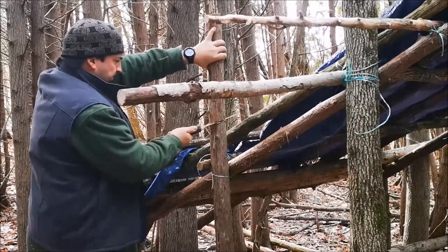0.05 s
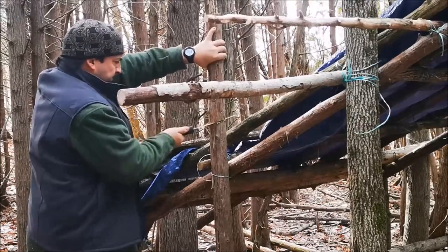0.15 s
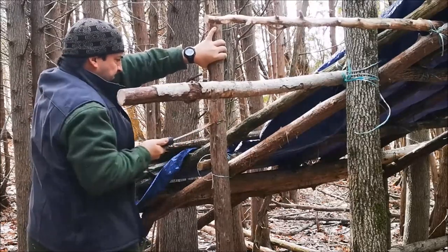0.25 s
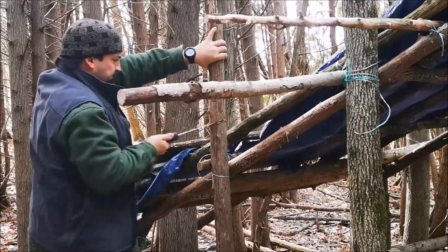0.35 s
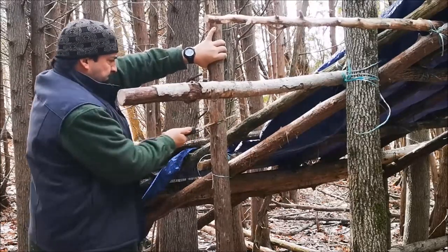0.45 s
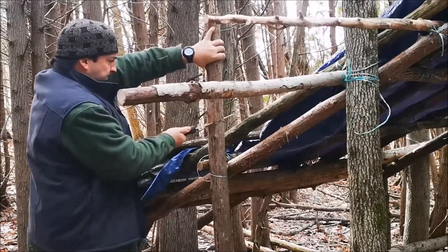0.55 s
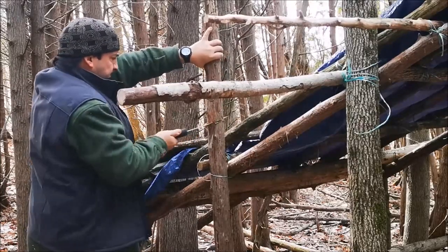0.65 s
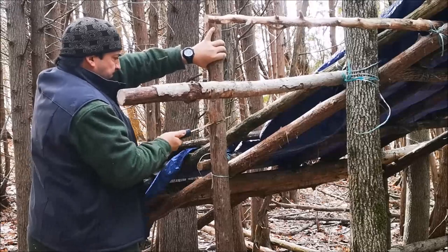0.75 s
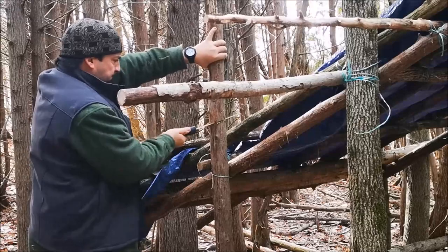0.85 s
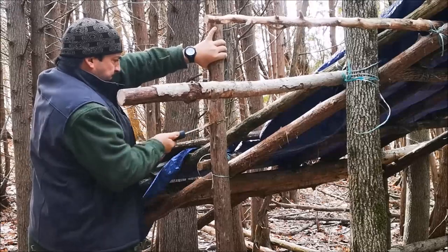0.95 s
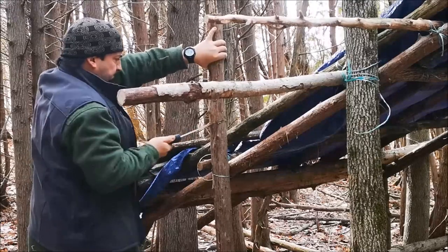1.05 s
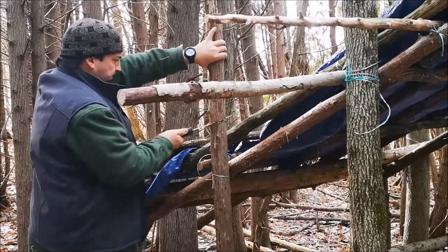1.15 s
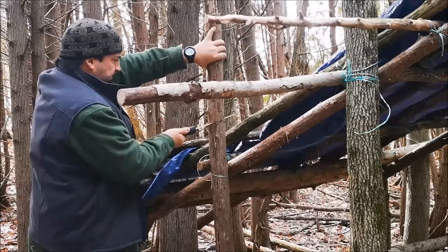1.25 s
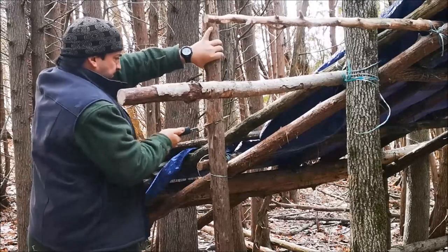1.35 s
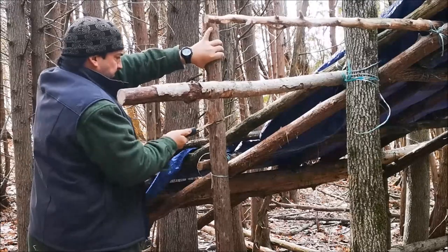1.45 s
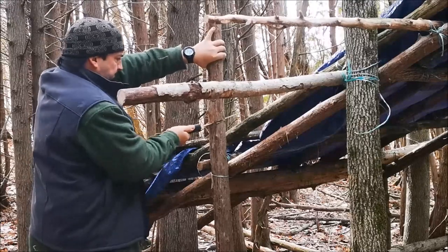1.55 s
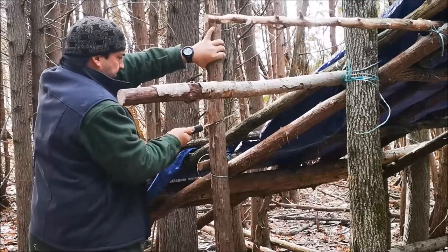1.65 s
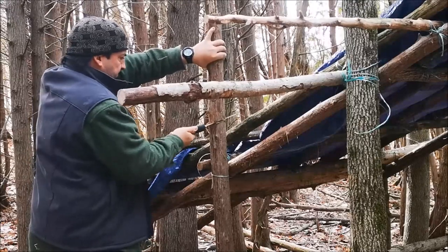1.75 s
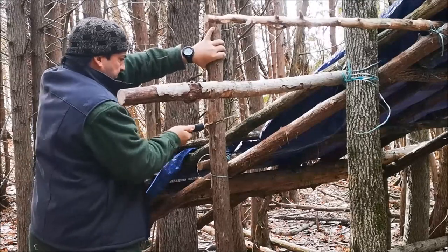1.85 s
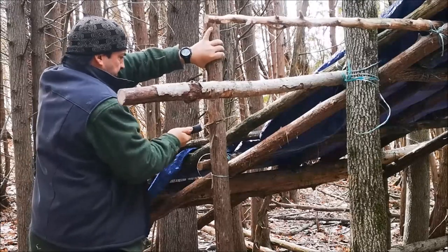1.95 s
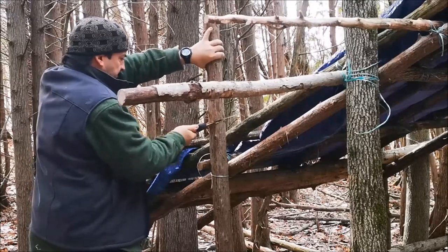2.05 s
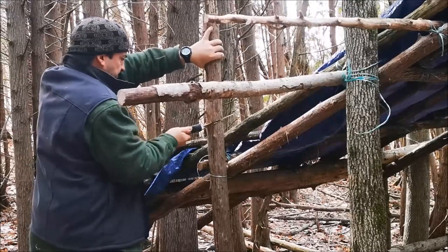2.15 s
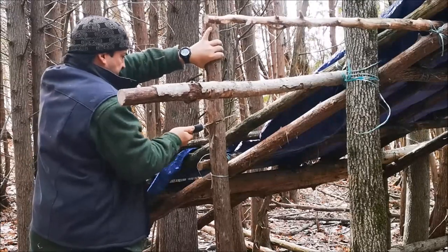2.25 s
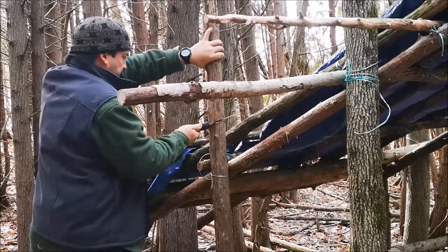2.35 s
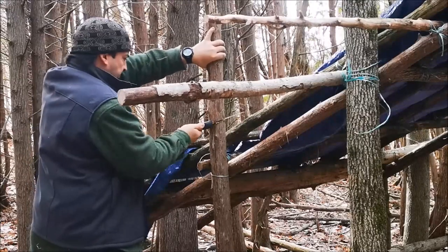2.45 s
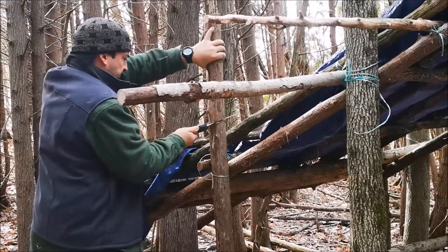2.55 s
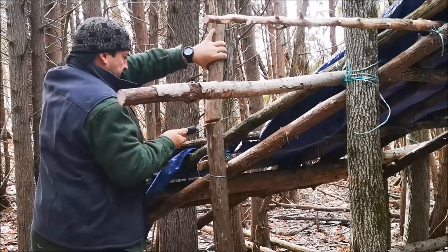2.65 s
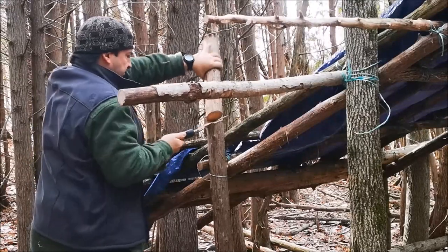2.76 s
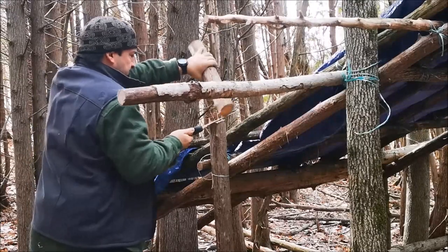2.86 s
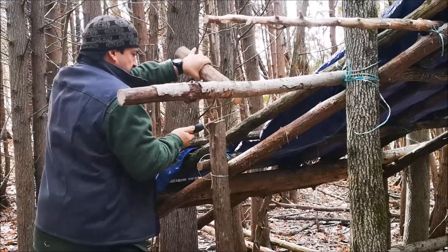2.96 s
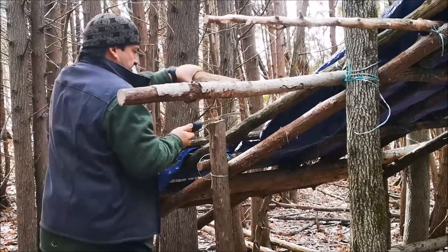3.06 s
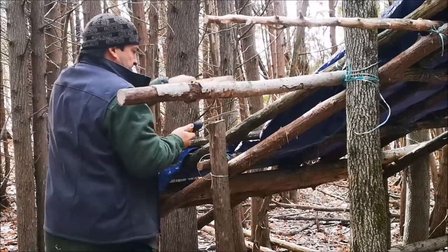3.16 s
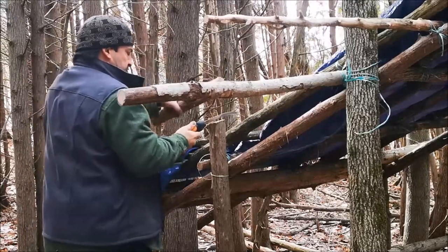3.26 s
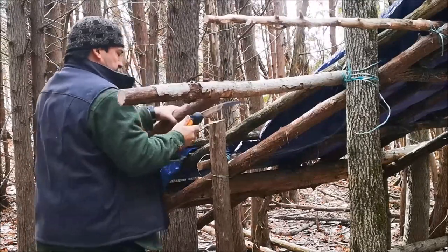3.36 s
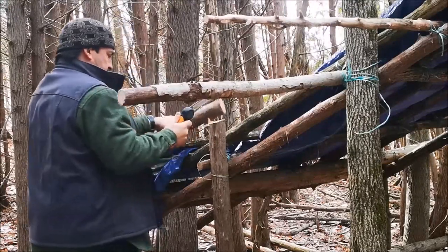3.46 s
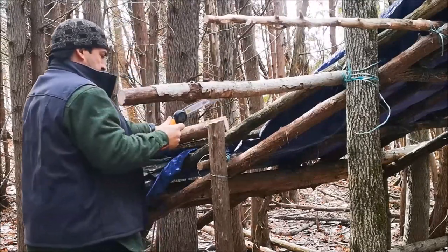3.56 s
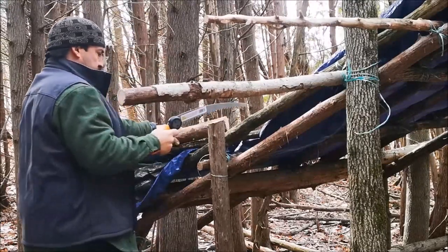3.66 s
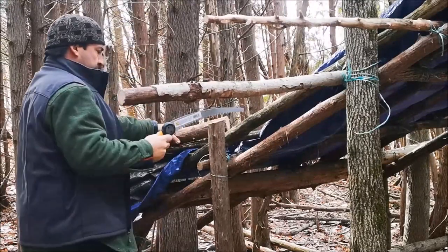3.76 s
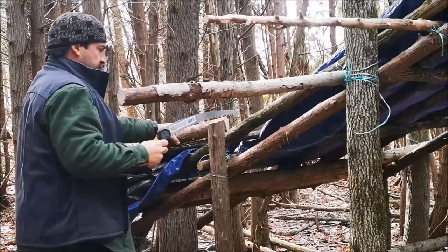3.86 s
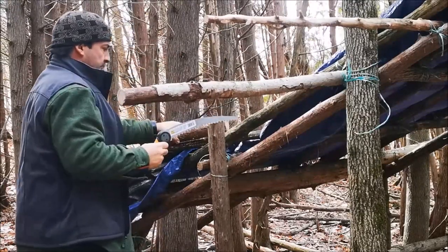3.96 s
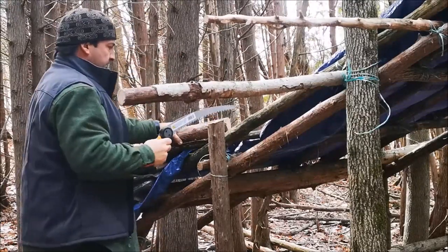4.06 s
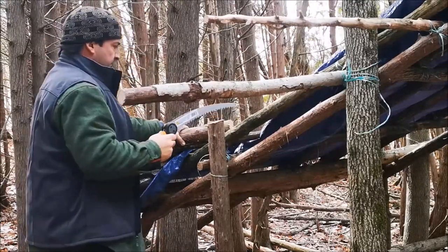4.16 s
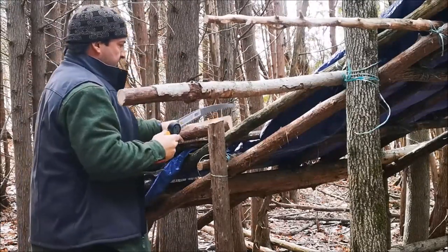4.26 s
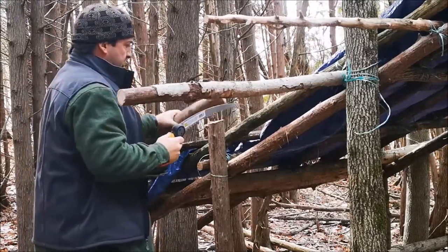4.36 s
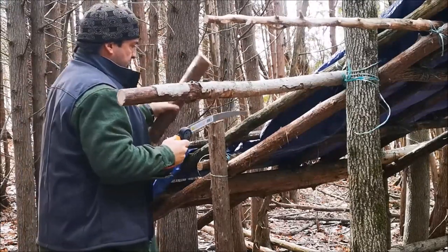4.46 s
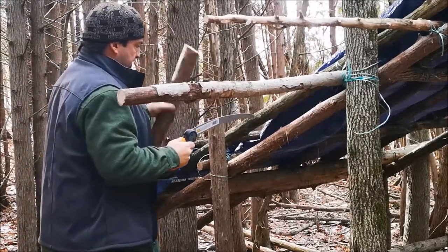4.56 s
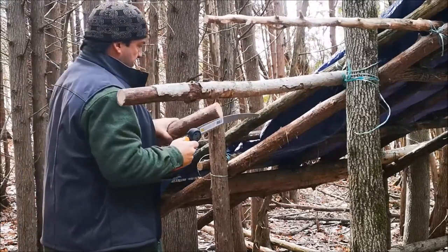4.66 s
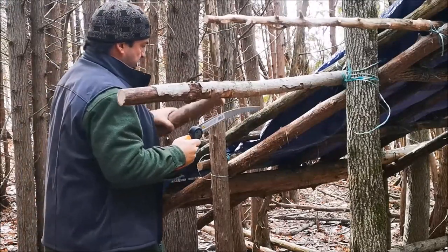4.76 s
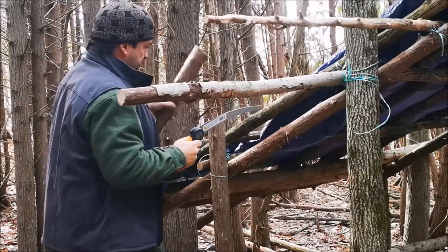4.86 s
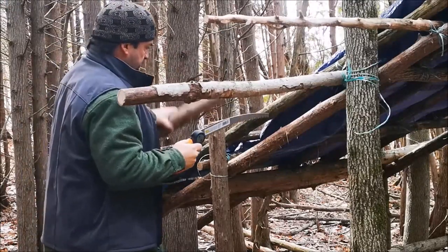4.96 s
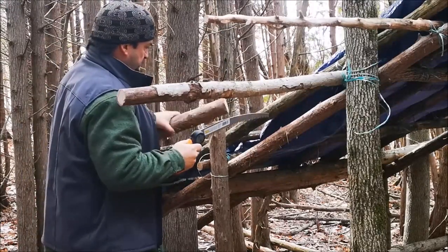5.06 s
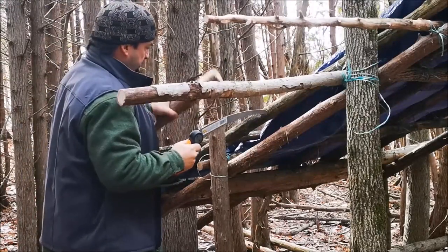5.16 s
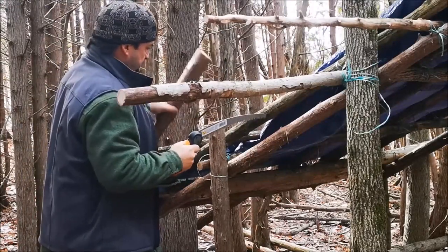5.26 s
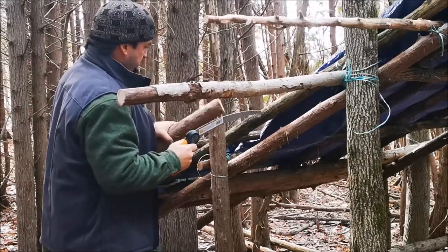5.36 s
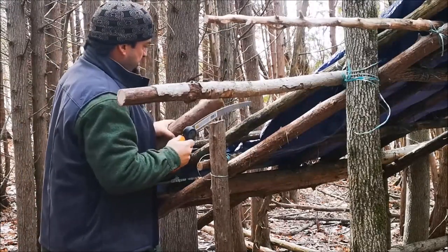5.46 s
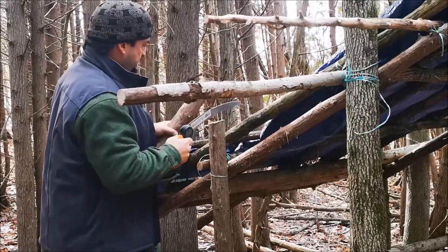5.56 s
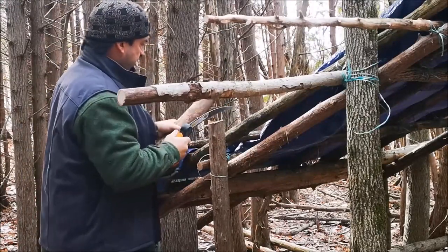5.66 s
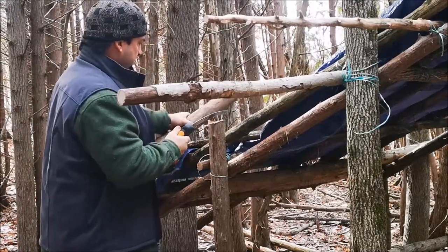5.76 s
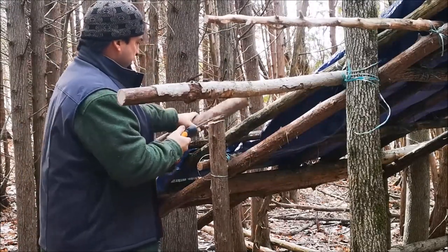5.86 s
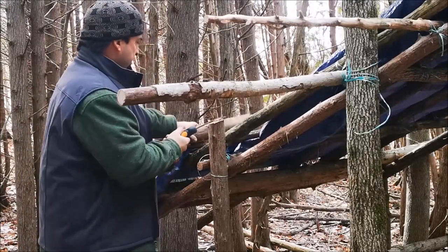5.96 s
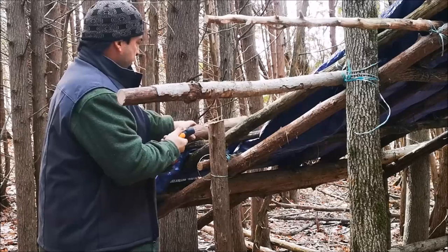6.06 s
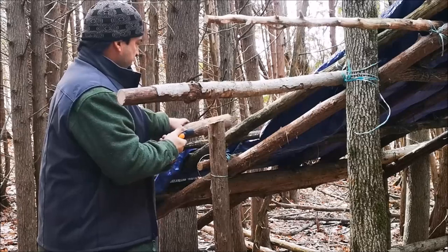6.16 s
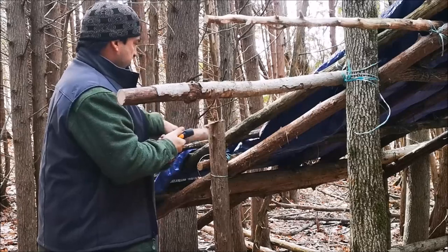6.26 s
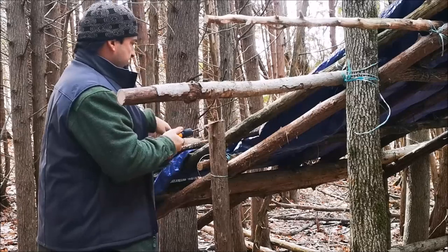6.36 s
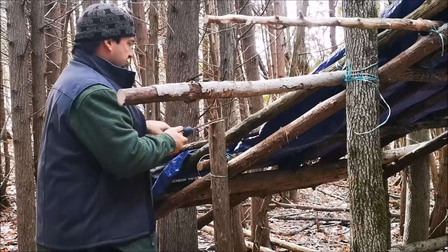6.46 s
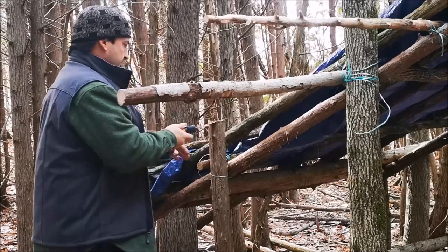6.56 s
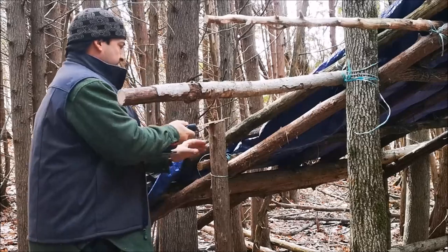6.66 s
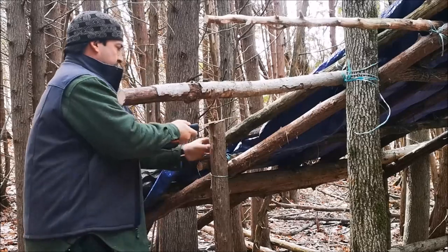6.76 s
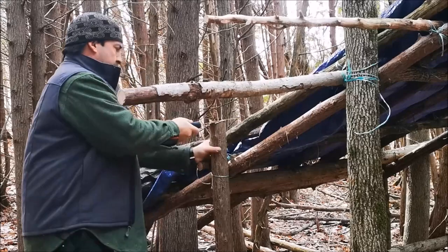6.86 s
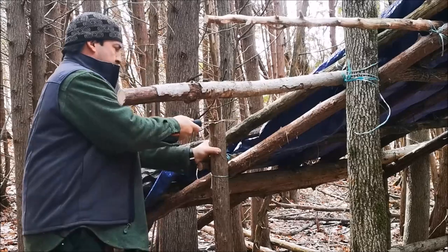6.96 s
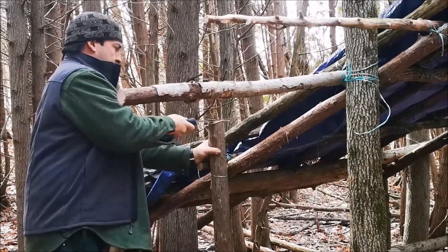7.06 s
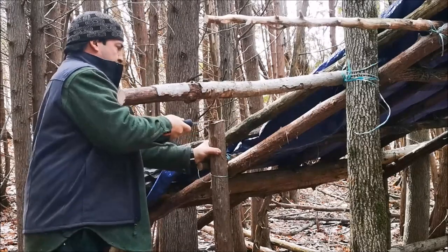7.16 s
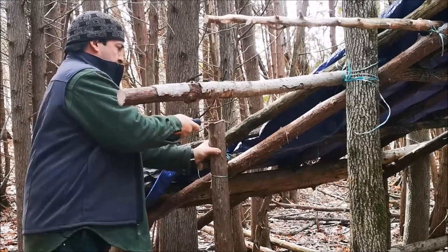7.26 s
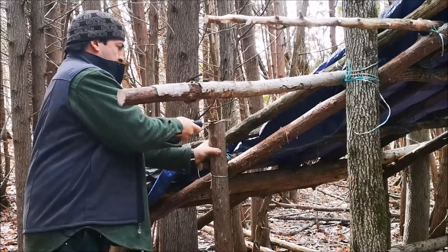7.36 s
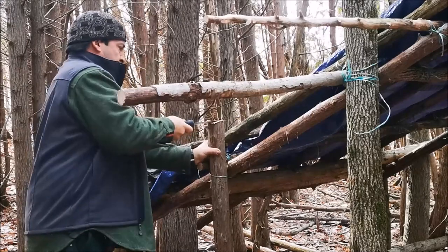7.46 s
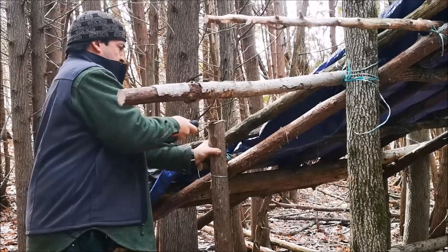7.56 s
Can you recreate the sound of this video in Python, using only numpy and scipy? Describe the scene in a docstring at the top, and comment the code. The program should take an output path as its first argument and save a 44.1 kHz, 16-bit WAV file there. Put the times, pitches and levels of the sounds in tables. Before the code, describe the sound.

A hand saw rasps through a wooden post outdoors, the wood snaps, a few light taps follow, and the sawing briefly resumes.

```python
"""Pruning saw in a wood

A saw rasps in a thin upright post: teeth tear fibres, ring wood and blade, shake the frame. The post
knocks in its lashings, is wrenched and snaps. The cut piece is handled, tapped three times and lands
on a pole; the saw bites again in the stump. Sleeves and bark rustle over a low distant rumble.
The two microphone ports colour the treble differently; the left one faces the work."""
import sys
import numpy as np
from scipy import signal
from scipy.fft import rfft, irfft
from scipy.io import wavfile
from scipy.ndimage import uniform_filter1d

SR = 44100
rng = np.random.default_rng(int(sys.argv[2]) if len(sys.argv) > 2 else 0)


def to_wav(s):
    """Save 16-bit WAV."""
    ch = np.atleast_2d(s).T  # columns
    pcm = np.round(np.clip(ch, -1, 1) * 32767)  # PCM
    wavfile.write(sys.argv[1], SR, pcm.astype(np.int16))


N = 336042

# strokes: t/s, length/s, end level/dB, swell/dB, low ring and shake/dB, high ring and grit/dB
PULLS = [(0.0, 0.04, -35.5, -4.5, 3.5, 0.5), (.309, .13, -34.5, 0.5, 3, 0), (.782, 0.057, -38, 0, -2, 0.5),
         (1.083, .11, -36, 2.5, -0.5, 0), (1.516, 0.048, -37.5, 4.5, -8, -2.5),
         (1.87, 0.087, -56.5, 5.5, 0, 6), (2.14, 0.077, -55.5, -3.5, 0, 7), (2.30, 0.043, -57, -1, 2, 4.5)]  # cutting
PUSHES = [(.09, 0.17, -45, 12.5, -0.5, 2), (.51, 0.16, -48, 13, 1.5, 3.5), (.70, 0.087, -48, 8, 2, 2.5),
          (.89, 0.14, -53, 7.5, -4.5, 2), (1.25, .15, -47.5, 13, 1, 1), (1.44, 0.066, -57.5, 5, 1.5, 2.5),
          (1.6, .11, -52.5, 5.5, -4, -0.5)]  # light return
# new cut in the stump: t/s, length/s, end level/dB, swell/dB, ring/dB, shake/dB, rise/s, fall/s
RESTARTS = [(6.939, 0.082, -56, 14, -8, -18, .04, 0.025),
            (7.032, 0.11, -51.5, -2.5, -12.5, -29, .015, 0.18),
            (7.12, 0.18, -36, 16.5, -8, -12.5, 0.082, 0.072),
            (7.355, 0.13, -52, 4.5, -10.5, -14, 0.03, 0.06), (7.545, 0.067, -37, 14, -8, -9, 0.025, .05)]
# resonances driven by the teeth: f/Hz, nominal width/Hz, level/dB
RING_LOW = [(874, 50, -1), (1174, 173, -3)]
RING_HIGH = [(1706, 340, -10.5), (2327, 57, 2.5), (2446, 79, -4), (2785, 45, -1.5)]
GRIT = [(3330, 660, -5), (4060, 200, -3), (4680, 350, 0)]
WHINE = [(5676, 250, 0)]
FRAME_SHAKE = [(119.3, 11, 5), (291, 70, 0.5), (453, 153, -17)]
STUMP_RING = [(1220, 66, -1.5), (1780, 160, -5.5), (2240, 170, 1.5), (2780, 180, 0), (3480, 270, -3),
              (4170, 310, -6), (4830, 250, -4), (5390, 470, 3)]
STUMP_SHAKE = [(82, 23, 5.5), (132.4, 48, 0), (300, 96, -11), (455, 91, -11)]
# offsets from the rasp: low ring/dB, high ring/dB, grit/dB, whine/dB, shake/dB
PULL_SHARES_DB, PUSH_SHARES_DB = (-12.5, -12, -20, -12.5, -10), (-6, -9, -20.5, -12.5, -11)
WOOD_SWELL_DB = (9, 4.5, -3.5, -2.5, 15.5)  # extra swell as the teeth sink in
# teeth catching, fibres cracking: t/s, level/dB, body re treble/dB
CRACKS = [(0.3104, -50, -34), (0.328, -32, -23), (0.35, -31.5, -18.5), (0.7045, -46, -40),
          (0.7298, -37.5, -30), (0.78, -41, -25), (0.94, -52.5, -25), (1.0875, -34.5, -21),
          (1.1197, -34, -37), (1.429, -40, -30), (1.482, -57, 4.5), (1.517, -49.5, -0.5),
          (1.5617, -39, -21), (1.6134, -41, -10.5), (2.0494, -35.5, -12.5), (2.0677, -48, -7),
          (2.148, -51, -5), (2.303, -46.5, -14), (2.4978, -42, -9), (2.5573, -46.5, -34.5),
          (2.768, -48.5, 1), (3.0465, -46, -16), (3.256, -59.5, 0), (3.9609, -55, -37), (4.2905, -62.5, 6),
          (4.4738, -55, -1), (5.559, -52, -11), (5.6038, -53.5, -18), (6.0723, -63.5, -14.5),
          (6.1575, -63.5, 10), (6.303, -56, -11), (6.488, -53, -17), (6.8467, -56.5, -0.5), (7.133, -53, 2),
          (7.1694, -43, -25), (7.2567, -29.5, -20), (7.3095, -39, -14.5), (7.335, -45, -28),
          (7.51, -61, -25), (7.537, -52.5, -14), (7.569, -45.5, -23)]
# post snapping: t/s, level/dB, body re treble/dB, tail t60/s, tail/dB
SNAP = [(2.809, -13, -13, 0.098, 1)]
# post in its lashings: t/s, level/dB, contact/ms, rattle re knock/dB
KNOCKS = [(0.108, -39, 2.9, -9.5), (1.599, -45, 2, -7), (1.878, -35, 1.4, -7), (2.151, -33.5, 0.98, -9),
          (2.299, -58, 1.2, -5.5), (2.468, -39, 1.76, -13), (2.598, -49.5, 3.1, -12.5),
          (2.77, -33, 1.7, -20), (2.991, -38.5, 2.4, -6.5), (6.725, -40, 1.26, -8.5)]
# blade on cut piece: t/s, ring/dB, contact/ms, tick/dB, thump/dB, sway 1/dB, sway 2/dB, sway gap/s
TAPS = [(4.807, -31, 0.089, -40.5, -40, -38.5, -48.5, .06),
        (5.15, -28.5, 0.16, -36.5, -30.5, -38, -38, .051), (5.4996, -33, 0.13, -34.5, -31.5, -37, -41, .05)]
# cut piece on a pole: t/s, level/dB, contact/ms
DROPS = [(6.502, -31, 0.36), (6.52, -36.5, 0.89), (6.585, -47.5, 0.76), (6.61, -54, 0.6)]
# struck modes: f/Hz, level/dB, t60/s
POST_MODES = [(88, -6.5, 0.28), (194, -5, 0.0069), (260, 1, 0.075), (347, -5.5, 0.055), (414.5, -1.5, 0.13),
              (621, 4, .04), (900, -6, .07), (1000, -10.5, .08), (1900, -10.5, .04), (2560, -13.5, .04)]
SWAY_MODES = [(62, 0.5, 0.2), (80.5, -4, 0.32), (120, -3.5, 0.14), (248, -12, 0.089)]
FRAME_MODES = [(120, -8.5, 0.012), (183.5, 13, 0.044), (296.6, -7, 0.063), (450, -27, 0.11),
               (834, -25, .05)]
PIECE_MODES = [(546, -8, 0.049), (848, -2, 0.035), (1060, -3.5, 0.044), (1324, -3.5, 0.038),
               (1750, 2.5, 0.04), (2340, 4, 0.021), (2910, 4, 0.025), (3544, -4, 0.054), (4740, -10, 0.023)]
POLE_MODES = [(267, -3, 0.097), (440, 0, 0.1), (474, -9.5, 0.07), (1060, 9, 0.067), (2070, -10, .05),
              (2530, 3, 0.029)]
# sleeves and bark, and fibres tearing just after the snap: t/s, rise/s, hold/s, fall/s, level/dB, coarse re
# fine/dB
RUBS = [(1.777, 10, 0.11, -0.9, -69, -12.5), (2.062, 0.1, 0.0015, 0.18, -51.5, -10.5),
        (2.516, 0.13, .002, 0.07, -54, -9.5), (2.551, .005, 0.0017, 0.09, -46.5, -17),
        (2.775, 0.01, 0.041, 0, -45, -12), (2.826, 0, .01, 0.0854, -25.5, -28),
        (2.875, 0.3, 0.026, 0.23, -41, -14.5), (3.012, 0.3, 0.061, .15, -52, -8),
        (3.276, 0.12, .002, 0.05, -57, -6), (3.391, 0.09, 0.015, 0.1, -37.5, -15),
        (3.644, 0.2, .03, 2.1, -65.5, -10.5), (3.73, 0.03, .1, 0.4, -49.5, -16),
        (3.893, -2.15, 0.078, 0.9, -62, -20), (4.104, 0.05, .02, 0.11, -41, -11.5),
        (4.22, 0.17, .002, 0.17, -48.5, -11.5), (4.283, -0.03, 0.023, 0.13, -54, -4.5),
        (4.344, -1.5, 0.018, 0.4, -58.5, -10), (4.413, 0.1, 0.011, 0.175, -48.5, -14),
        (4.518, -5, .002, .5, -84, -11), (4.826, 0.2, 0.06, 0.2, -55.5, -13),
        (4.969, -1.2, 0.0017, .08, -57, -27), (5.168, -0.11, 0.059, 0.24, -56, -13),
        (5.526, .01, .002, 0.12, -47, -17), (5.578, 0.1, .06, 0.12, -61, -16),
        (6.084, 0.1, 0.1, 0.6, -65.5, -3), (6.293, .12, 0.11, 1.4, -58, -12.5),
        (6.495, 0.08, 0.078, -0.14, -58.5, -1.5), (6.719, 0.11, 0.011, 0.09, -44.5, 0),
        (6.842, -0.04, .002, 0.16, -55.5, -6)]
# background level curves: t/s, level/dB
RUMBLE_LEVEL = [(0.0, -48.5), (0.55, -54), (1.91, -63), (2.01, -61.5), (2.76, -62), (2.99, -50),
                (3.16, -61.5), (4.2, -59), (4.31, -55.5), (5.03, -64.5), (5.62, -60.5), (6.13, -62),
                (6.6, -58), (7.62, -60)]
HUM_LEVEL = [(0.0, -51), (0.42, -53.5), (1.87, -67), (2.59, -83), (2.97, -64), (3.12, -78), (3.35, -76.5),
             (3.56, -67), (3.95, -77.5), (4.05, -67.5), (5.6, -68.5), (6.09, -79), (7.11, -62), (7.62, -74)]
# background spectra: f/Hz, level/dB
RUMBLE_TONE = [(11, -47), (18, 1), (76, 2), (120, -6), (151, -18.5), (193, -19), (226, -14.5), (254, -24),
               (334, -26), (400, -34.5), (520, -62.5), (880, -120)]
AIR_TONE = [(150, 0.5), (400, -12.5), (1000, -7.5), (2000, -11.5), (3500, -21.5), (6000, -25.5),
            (10000, -24), (16000, -29.5)]
# microphone port responses: f/Hz, gain/dB
LEFT_PORT = [(300, 2), (3000, 0), (5000, 1.5), (6300, 4.5), (7400, 15.5), (7900, 8.5), (8500, -6),
             (10000, -7.5), (11600, -3), (12400, -21), (13000, -5.5), (14900, -11), (16500, -23)]
RIGHT_PORT = [(300, 2.5), (700, -11), (2400, -10), (3200, -8.5), (5300, -7.5), (6600, -18.5), (7900, -3),
              (9400, -0.5), (11000, -12), (12400, -23.5), (13300, -19), (14900, -30), (16500, -31.5)]


def saw():
    """Teeth tear fibres in an uneven stream that rings post, stump and blade and shakes the frame."""
    post_power, stump_power = np.zeros((6, N)), np.zeros((3, N))
    for strokes, rise_s, fall_s, shares_db in ((PULLS, .005, .071, PULL_SHARES_DB),
                                               (PUSHES, .073, .048, PUSH_SHARES_DB)):
        for s, length_s, db, swell_db, low_db, high_db in strokes:
            layers_db = db + np.r_[0, np.add(shares_db, [low_db, high_db, high_db, 0, low_db])]
            swells_db = swell_db + np.r_[0, WOOD_SWELL_DB]
            add_gesture(post_power, s, rise_s, length_s, fall_s, layers_db, swells_db)
    for s, length_s, db, swell_db, ring_db, shake_db, rise_s, fall_s in RESTARTS:
        layers_db = db + np.array([0, shake_db, ring_db])
        add_gesture(stump_power, s, rise_s, length_s, fall_s, layers_db, np.full(3, swell_db))
    teeth = grain(per_s=430, spread_db=0.5, tail_ms=1.7, bed=0.9)
    rasp_tone = [(500, -35), (1600, -27), (4500, -32), (6500, -4), (10000, 1.5), (14900, 0.5),
                 (15600, -16)]
    rasp = teeth * colour(noise(0.06), rasp_tone)
    low = resonate(teeth * noise(0.36), RING_LOW, wander_db=5)
    high = resonate(teeth * noise(0.35), RING_HIGH, wander_db=4)
    grit = resonate(teeth * noise(0.13), GRIT, wander_db=5.5)
    whine = resonate(teeth * noise(0.52), WHINE, wander_db=-1)
    shake = resonate(teeth * noise(0.81), FRAME_SHAKE, wander_db=7)
    stump_shake = resonate(teeth * noise(0.95), STUMP_SHAKE, wander_db=3.5)
    stump_ring = resonate(teeth * noise(0.35), STUMP_RING, wander_db=4.5)
    power = [post_power[0] + stump_power[0], *post_power[1:], *stump_power[1:]]  # cuts share the rasp
    return mix(power, (rasp, low, high, grit, whine, shake, stump_shake, stump_ring))


def cracks(tail_t60_s=0.088, tail_db=-10.5):
    """Fibres break with a sharp tick and a ragged tail; blade taps add a thin tick."""
    treble_env, body_env = np.zeros(N), np.zeros(N)
    for s, db, body_db, t60_s, late_db in [(*row, tail_t60_s, tail_db) for row in CRACKS] + SNAP:
        burst = undb(db) * (decay(0.024) + undb(late_db) * decay(t60_s))
        add(treble_env, s, burst)
        add(body_env, s, burst * undb(body_db))
    for s, _, _, tick_db, *_ in TAPS:
        add(treble_env, s, undb(tick_db) * (decay(0.011) + undb(-4) * decay(0.11)))
    treble_tone = [(1000, -37), (3000, -10), (5000, -4.5), (10000, 1), (13000, 5.5), (16000, 5.5)]
    body_tone = [(700, -24.5), (1500, -3.5), (2600, -1.5), (4000, -4.5), (6000, -14)]
    treble = colour(noise(0.81), treble_tone)
    body = undb(4) * unit(colour(noise(0.51), body_tone))
    return treble_env * treble + body_env * body


def post_knocks(sway_delay_s=0.0026, sway_contact_ms=3.1, sway_rattle_db=-23):
    """The post rings when knocked, sways twice per tap and rattles on in its lashings."""
    sways = [(s + sway_delay_s + late_s, db, sway_contact_ms, sway_rattle_db)
             for s, *_, first_db, second_db, gap_s in TAPS
             for late_s, db in ((0, first_db), (gap_s, second_db))]
    rattle_env = np.zeros(N)
    for s, db, _, rattle_db in KNOCKS + sways:
        add(rattle_env, s, undb(db + rattle_db) * decay(0.24))
    low_noise = unit(band(band(noise(1), 210, 400), 180, 720))
    rattle = band(rattle_env * low_noise, 300, 900)
    ring = strike(KNOCKS, POST_MODES, scatter_db=2.2) + strike(sways, SWAY_MODES, scatter_db=4.4)
    return rattle - ring  # inverted: first push is towards the microphone


def blade_taps(thump_contact_ms=1.8):
    """The blade rings the cut piece; the frame thumps in answer."""
    thumps = [(s, thump_db, thump_contact_ms) for s, _, _, _, thump_db, *_ in TAPS]
    frame = strike(thumps, FRAME_MODES, scatter_db=2.7)
    return frame + chatter(strike(TAPS, PIECE_MODES, scatter_db=2.8), t60_s=0.036)


def piece_drop():
    """The cut piece lands on a pole and rings it with weakening blows."""
    return chatter(strike(DROPS, POLE_MODES, scatter_db=3.1), t60_s=0.055)


def rustle():
    """Cloth and bark rub in soft, dense grains; torn fibres rustle on just after the snap."""
    power = np.zeros((3, N))
    for s, rise_s, hold_s, fall_s, db, coarse_db in RUBS:
        hollow_db = -4.5 + 1.9 * coarse_db  # coarser rubs sound hollower
        add_gesture(power, s, rise_s, hold_s, fall_s, db + np.r_[0, coarse_db, hollow_db], np.zeros(3))
    grains = grain(per_s=770, spread_db=4.5, tail_ms=4.4, bed=0.31)
    fine_tone = [(1000, -39), (3000, -15), (5000, -4.5), (10000, -2), (14900, -4), (15600, -19.5)]
    fine = grains * colour(noise(0.36), fine_tone)
    coarse_modes = [(1980, 220, 0), (2478, 710, 5), (3600, 2300, -7.5)]
    coarse = resonate(grains * noise(0.058), coarse_modes, wander_db=3.5)
    hollow = resonate(grains * noise(0.22), [(654, 1300, -3.5), (1025, 420, 0)], wander_db=1.5)
    return mix(power, (fine, coarse, hollow))


def far_rumble(wander_db=2):
    """Distant rumble and a wavering low hum, alike at both ports."""
    hum = level_curve(HUM_LEVEL) * unit(band(rng.standard_normal(N), hz=80.8, width_hz=3.5))
    rumble_env = level_curve(RUMBLE_LEVEL) * undb(wander_db * walk(11))
    return hum + rumble_env * unit(colour(noise(.99), RUMBLE_TONE))


def open_air():
    """Faint steady hiss."""
    return undb(-73) * unit(colour(noise(0.058), AIR_TONE))


def undb(db):
    """Decibels to gain."""
    return np.exp(np.asarray(db) * np.log(10) / 20)


def unit(x):
    """Scaled to rms 1."""
    return x / np.sqrt(np.mean(x ** 2))


def level_curve(points):
    """Gain per sample through (t/s, level/dB) points."""
    return undb(np.interp(np.arange(N) / SR, *np.transpose(points)))


def colour(x, points):
    """Minimum-phase filter through (f/Hz, gain/dB) points."""
    hz, db = np.transpose(points)
    gain_db = np.interp(np.log(np.linspace(1, SR / 2, 4097)), np.log(hz), db)
    cepstrum = irfft(gain_db * np.log(10) / 20)
    cepstrum[1:4096] *= 2  # fold onto positive time
    cepstrum[4097:] = 0
    impulse = irfft(np.exp(rfft(cepstrum)))[None, :4096]
    return signal.fftconvolve(x, impulse, axes=1)[:, :N]


def band(x, hz, width_hz):
    """Resonance, gain 1 at centre."""
    return signal.lfilter(*signal.iirpeak(hz, hz / width_hz, SR), x)


def noise(shared):
    """Noise at both ports; `shared` is the common fraction of power."""
    return np.sqrt(shared) * rng.standard_normal(N) + np.sqrt(1 - shared) * rng.standard_normal((2, N))


def walk(rate_hz):
    """Ramps between random levels; spread near 1."""
    hold = int(SR / rate_hz)
    return uniform_filter1d(np.repeat(rng.standard_normal(N // hold + 1), hold), hold)[:N]


def grain(per_s, spread_db, tail_ms, bed):
    """Envelope of tiny random slips with short tails over an even bed; rms 1."""
    slips = (rng.random(N) < per_s / SR) * undb(spread_db * np.minimum(rng.exponential(size=N), 4))
    power = signal.lfilter([1], [1, -np.exp(-1000 / (tail_ms * SR))], slips ** 2)
    return unit(np.sqrt(bed + power / power.mean()))


def resonate(drive, modes, wander_db):
    """Resonances whose shares wander as the contact point moves; rms 1."""
    return unit(sum(undb(db + wander_db * walk(25)) * band(band(drive, hz, 2 * width), hz, 2 * width)
                    for hz, width, db in modes))


def decay(t60_s):
    """Exponential envelope, 0.3 s long."""
    return np.exp(-np.log(1000) * np.arange(int(.3 * SR)) / SR / t60_s)


def strike(events, modes, scatter_db):
    """Half-sine pushes ring one object; mode levels scatter per blow."""
    out = np.zeros(N)
    t = np.arange(len(decay(1))) / SR
    for s, peak_db, contact_ms, *_ in events:
        offsets_db = scatter_db * rng.standard_normal(len(modes))
        ring = sum(-undb(db + offset_db) * decay(t60_s) * np.sin(2 * np.pi * hz * t)
                   for offset_db, (hz, db, t60_s) in zip(offsets_db, modes))
        push = np.sin(np.pi * np.clip(t[:441] * 1000 / contact_ms, 0, 1))
        blow = np.convolve(ring, push)[:len(t)]
        add(out, s, undb(peak_db) * blow / np.abs(blow).max())
    return out


def chatter(x, t60_s):
    """Rough contact: one jolt plus a 20 ms run of smaller ones."""
    jolts = rng.standard_normal(882) ** 3 * decay(t60_s)[:882]
    jolts /= np.sqrt(np.sum(jolts ** 2))
    return undb(-2) * x + undb(-4) * signal.fftconvolve(x, jolts)[:N]


def add(out, s, sound):
    """Mixes a sound in at s seconds."""
    start = int(s * SR)
    sound, start = sound[..., max(-start, 0):], max(start, 0)
    out[..., start:start + sound.shape[-1]] += sound[..., :N - start]


def add_gesture(power, s, rise_s, hold_s, fall_s, db, swell_db):
    """Adds one movement's power per layer: rise before s, swell up to db, fall. Edge times per 30 dB."""
    rise_s, hold_s, fall_s = np.maximum([rise_s, hold_s, fall_s], .001)
    t = np.arange(int((2 * rise_s + hold_s + 2 * fall_s) * SR)) / SR - 2 * rise_s
    edges_db = 30 * (np.minimum(t / rise_s, 0) - np.maximum((t - hold_s) / fall_s, 0))
    held_db = np.c_[db] - np.c_[swell_db] * np.clip(1 - t / hold_s, 0, 1)
    add(power, s - 2 * rise_s, undb(2 * (edges_db + held_db)))


def mix(powers, layers):
    """Sum of layers, each under its power envelope."""
    return sum(np.sqrt(power) * layer for power, layer in zip(powers, layers))


def scene():
    """The work reaches the right port duller; the rumble reaches both alike."""
    work = saw() + rustle() + cracks() + post_knocks() + blade_taps() + piece_drop()
    rumble, air = far_rumble(), open_air()
    left = colour(work[:1] + air[:1], LEFT_PORT)
    right = colour(work[1:], RIGHT_PORT) + undb(-2.5) * air[1:]
    return np.vstack([left, right]) + rumble


def record(dry):
    """A limiter ducks very loud sound briefly; a low-pass cuts the top."""
    knee_db, slope, smooth_ms, top_hz = -30, .3, 10, 16450
    pole = np.exp(-1000 / (smooth_ms * SR))
    power = signal.lfilter([1 - pole], [1, -pole], np.mean(dry ** 2, axis=0))
    gain = (1 + (power / undb(2 * knee_db)) ** 2) ** (-slope / 2)
    return signal.sosfilt(signal.ellip(8, .2, 70, top_hz, fs=SR, output="sos"), gain * dry)


dry = scene()
out = record(dry)
to_wav(out)
```